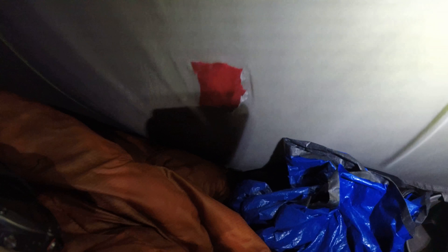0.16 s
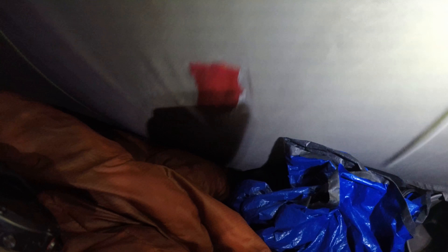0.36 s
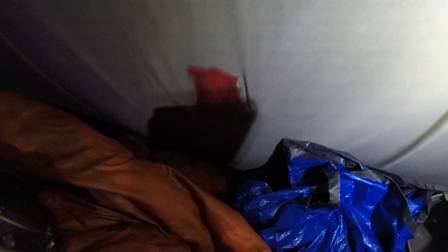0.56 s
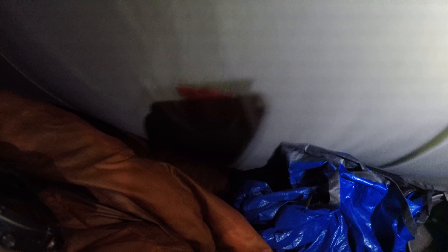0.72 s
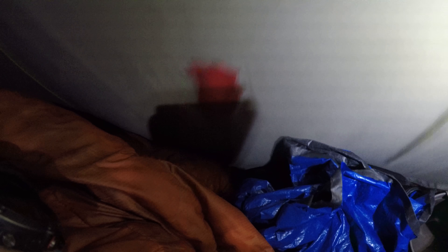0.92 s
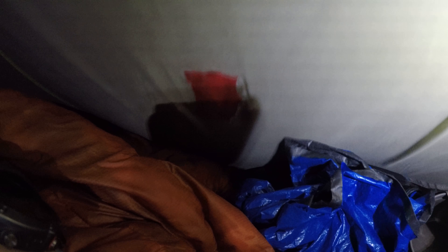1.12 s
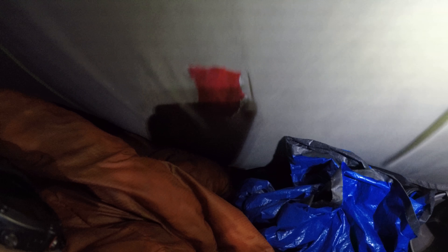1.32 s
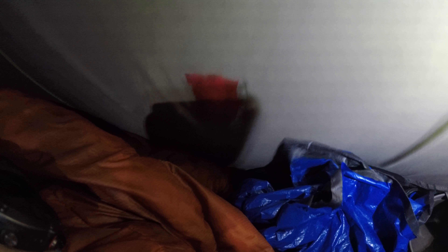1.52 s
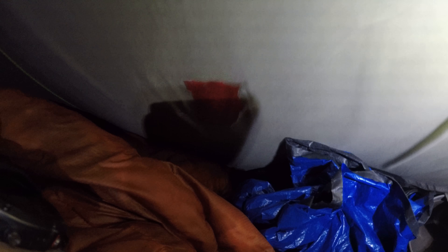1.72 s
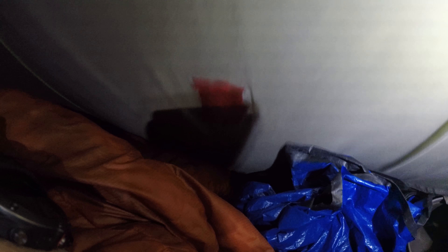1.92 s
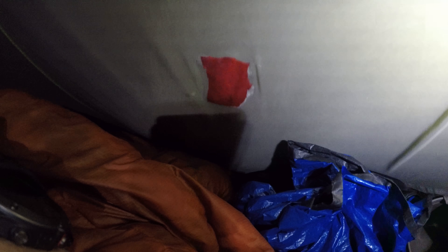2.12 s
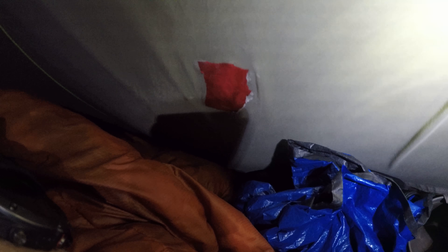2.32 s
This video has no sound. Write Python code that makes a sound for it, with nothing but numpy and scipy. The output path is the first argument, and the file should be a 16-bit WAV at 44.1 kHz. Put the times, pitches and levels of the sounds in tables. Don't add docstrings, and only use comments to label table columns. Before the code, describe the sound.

Tent walls shake in strong wind, heard close from inside: deep uneven rumble, crackling cloth rustle, dull knocks and sharp creasing snaps. One microphone fades in quickly after brief silence, its treble opening gradually.

```python
import sys
import numpy as np
from scipy import signal
from scipy.fft import rfft, irfft, next_fast_len
from scipy.io import wavfile
from scipy.ndimage import uniform_filter1d

SR = 44100
rng = np.random.default_rng(int(sys.argv[2]) if len(sys.argv) > 2 else 0)


def dump(signal):
    limited = np.clip(np.atleast_2d(signal).T, -1, 1)
    pcm = np.round(limited * 32767).astype(np.int16)
    wavfile.write(sys.argv[1], SR, pcm)


def convert_level_to_amplitude(level_db):
    exponent = np.asarray(level_db, float) / 20
    return 10 ** exponent


N = 104384

START_S, FULL_S = 0.128, 0.27

# t/s, wind pressure level/dB, cloth shaking level/dB
GUSTS = [(.28, -20, -38), (.5, -18.5, -37), (.56, -14.5, -27), (.62, -14, -30.5), (0.659, -15.5, -35.5),
         (.75, -15, -33.5), (.88, -10, -30), (1.0, -10.5, -28), (1.2, -14, -29.5), (1.4, -15.5, -36.5),
         (1.5, -16.5, -37.5), (1.56, -13, -26), (1.65, -13.5, -30.5), (1.73, -17.5, -36.5),
         (1.84, -15.5, -34.5), (2.08, -14.5, -31.5), (2.14, -22.5, -39.5), (2.239, -16.5, -29.5)]
# f/Hz, level/dB per Hz
RUMBLE_COLOUR = [(18, -24), (30, 2), (76, -1), (150, -3.5), (230, -11), (400, -19.5), (800, -51.5),
                 (2000, -80)]
# f/Hz, level/dB per Hz
RUSTLE_COLOUR = [(400, -9), (900, -2), (1500, 5.5), (2100, -4), (5300, -6.5), (6200, -15.5), (8800, -16),
                 (13000, -47.5)]
PATCH_BORDERS = [1100, 2100, 3500, 5800]
# f/Hz, level/dB per Hz
THUMP_COLOUR = [(100, -60), (200, -1.5), (330, -2.5), (500, 0.5), (720, -1.5), (880, -11), (1100, -19),
                (2500, -19)]
# f/Hz, level/dB per Hz
HISS_COLOUR = [(10800, -13), (11600, -1), (12500, 6), (14000, 2.5), (15300, -1)]
# centre t/s, rustle level/dB, thump level above the rustle/dB, half length t/s
WALL_FLAPS = [(0.277, -32, 13, 0.022), (0.322, -36, 14, 0.013), (0.417, -31, 8.5, 0.027),
              (0.475, -30.5, 10, 0.0076), (0.575, -17.5, -4.5, 0.034), (0.707, -16.5, -9, 0.01),
              (0.742, -16, -11, 0.011), (0.769, -21.4, 3.5, 0.012), (0.864, -15, -27, 0.064),
              (0.992, -15, 1, 0.0081), (1.064, -21, 4.5, 0.026), (1.11, -19, -5, 0.0049),
              (1.17, -18, -4, 0.0071), (1.25, -26, -12, 0.012), (1.282, -18.5, -10, 0.009),
              (1.337, -24, -1.5, 0.015), (1.418, -36, 5, 0.0069), (1.455, -23, 5.5, 0.01),
              (1.501, -26.5, 8.5, 0.0072), (1.601, -28.5, -14, 0.032), (1.652, -16, 3, 0.004),
              (1.703, -29.5, 8, 0.004), (1.794, -23.5, 4.5, 0.017), (1.858, -25, 1.5, 0.041),
              (1.975, -26, -35, 0.02), (2.002, -25, 2, 0.0053), (2.06, -36.5, 7, 0.025),
              (2.218, -24, 4.5, 0.011), (2.251, -26, 6, 0.0053), (2.33, -18, 3, 0.0057)]
# t/s, peak level/dB
TAUT_KNOCKS = [
    (0.356, -8.5),
    (0.565, -17),
    (1.044, -23),
    (1.194, -17),
    (1.603, -8.5),
    (1.658, -22),
    (1.882, -9.5),
    (2.043, -10),
    (2.094, -7),
    (2.276, -6.5),
]
# t/s, peak level/dB
CREASE_SNAPS = [(0.4754, -14), (0.5498, -3), (0.571, -9), (0.769, -20), (0.7844, -14), (0.8274, -8.5),
                (0.8739, -3), (0.9077, -7), (0.923, -10), (1.1098, -7), (1.195, -8), (1.4456, -9),
                (1.4544, -17), (1.564, -13), (1.6114, -22), (1.6542, -8), (1.86, -8.5), (1.884, -29),
                (1.89, -7.5), (1.897, -6), (2.0434, -26), (2.067, -10.5), (2.0874, -15), (2.3174, -19)]
# f/Hz, level/dB per Hz
SNAP_COLOUR = [(300, 0), (1500, 3), (5000, -4), (8000, -7), (11000, -23), (15300, -37)]


def colour(x, table):
    size = next_fast_len(N + 8192)
    hz = np.maximum(np.fft.rfftfreq(size, 1 / SR), 1)
    f, db = np.array(table).T
    gain = convert_level_to_amplitude(np.interp(np.log(hz), np.log(f), db, left=-120, right=-120))
    shaped = irfft(rfft(x, size) * gain, size)[..., :N]
    return shaped / np.sqrt(np.mean(gain ** 2))


def walk(per_s):
    hold = int(SR / per_s)
    steps = np.repeat(rng.standard_normal(N // hold + 1), hold)
    w = uniform_filter1d(uniform_filter1d(steps, hold), hold)[:N]
    return (w - w.mean()) / w.std()


def buffet(pressure_db, lift):
    wind = colour(rng.standard_normal(N), RUMBLE_COLOUR)
    return wind * convert_level_to_amplitude(pressure_db + 1.2 * walk(33)) * lift ** 0.1


def crackle():
    per_s, spread_db, top_db, decay_s, share = 900, 5.5, 8, 0.00082, 0.59
    chance, luck = rng.random((2, N))
    size_db = np.minimum(-spread_db * np.log(luck + 1e-9), top_db)
    hits = (chance < per_s / SR) * convert_level_to_amplitude(size_db) ** 2
    power = signal.lfilter([1], [1, -np.exp(-1 / (decay_s * SR))], hits)
    return np.sqrt(share * power / power.mean() + 1 - share)


def patchy(x):
    lows = [signal.sosfiltfilt(signal.butter(2, hz, fs=SR, output="sos"), x) for hz in PATCH_BORDERS]
    total = 0
    for band in np.diff([0 * x, *lows, x], axis=0):
        flicker_db = 1.5 * walk(45) + 2.2 * walk(300)
        total = total + band * convert_level_to_amplitude(flicker_db)
    return total


def rustle(effort):
    return patchy(colour(rng.standard_normal(N) * effort, RUSTLE_COLOUR))


def thump(push, grains):
    uneven = convert_level_to_amplitude(1.2 * walk(35.2))
    return colour(rng.standard_normal(N) * push * grains * uneven, THUMP_COLOUR)


def open_treble(t, x):
    treble = signal.sosfiltfilt(signal.butter(4, 5840, "high", fs=SR, output="sos"), x)
    gain = convert_level_to_amplitude(np.interp(t, [START_S, FULL_S, 0.89], [0, -9.5, 0]))
    return x + treble * (gain - 1)


def top_hiss(t, effort, fade):
    tick_decay_s, wide_s = 0.006, 0.78
    tick = convert_level_to_amplitude(-54) * (t > START_S - 0.006) * np.exp(-np.maximum(t - START_S, 0) / tick_decay_s)
    rise_db = np.interp(t, [FULL_S, 0.93, 1.39, 2.05, t[-1]], [-30, -18.5, 0, 0, -7])
    top = effort * fade * convert_level_to_amplitude(-22.5 + rise_db)
    wide = convert_level_to_amplitude(-0.5) * np.clip((t - wide_s) / 0.15, 0, 1)
    mid, side = colour(rng.standard_normal((2, N)) * [top + tick, top * wide + tick], HISS_COLOUR)
    return mid + side * np.array([[1], [-1]])


def swells(t, times, levels_db, half_s):
    shape = np.exp(-0.5 * ((t - times[:, None]) / half_s[:, None]) ** 2)
    return np.sqrt(np.sum((convert_level_to_amplitude(levels_db)[:, None] * shape) ** 2, axis=0))


def flaps(t):
    s, flap_db, thump_db, half_s = np.array(WALL_FLAPS).T
    rustle_swell = swells(t, s, flap_db - 5, half_s)
    thump_swell = swells(t, s, flap_db + thump_db - 3, half_s)
    return rustle_swell, thump_swell


def bursts(t, times, peaks_db, decay_s, attack_s):
    age = t - times[:, None]
    shape = np.clip(age / attack_s + 1, 0, 1) * np.exp(-np.maximum(age, 0) / decay_s)
    return np.sqrt(np.sum((convert_level_to_amplitude(peaks_db)[:, None] * shape) ** 2, axis=0))


def knocks(t):
    s, peak_db = np.array(TAUT_KNOCKS).T
    return bursts(t, s, peak_db - 8, decay_s=0.015, attack_s=0.008)


def snaps(t):
    s, peak_db = np.array(CREASE_SNAPS).T
    strength = bursts(t, s, peak_db - 12, decay_s=0.003, attack_s=0.001)
    return colour(rng.standard_normal(N) * strength, SNAP_COLOUR)


def scene():
    t = np.arange(N) / SR
    s, pressure_db, shake_db = np.array(GUSTS).T
    pressure_db, shake_db = np.interp(t, s, pressure_db), np.interp(t, s, shake_db)

    shiver_db, grains = 0.5 * walk(28.91), crackle()
    flap_rustle, flap_thump = flaps(t)
    effort = np.hypot(convert_level_to_amplitude(shake_db + 3.5 + shiver_db), flap_rustle) * grains
    thump_bed_db = shake_db + 5.5
    push = np.sqrt(convert_level_to_amplitude(thump_bed_db + shiver_db) ** 2 + flap_thump ** 2 + knocks(t) ** 2)
    lift = push / convert_level_to_amplitude(thump_bed_db)

    opened = np.clip((t - START_S) / 0.014 + 1, 0, 1)
    fade = convert_level_to_amplitude(np.interp(t, [START_S, FULL_S], [-29, 0])) * opened
    cloth_fade = convert_level_to_amplitude(np.interp(t, [START_S, 0.22, FULL_S], [-23, -12, 0])) * opened

    low = (buffet(pressure_db, lift) + thump(push, grains)) * fade
    cloth = open_treble(t, rustle(effort) + snaps(t)) * cloth_fade
    return low + cloth + top_hiss(t, effort, fade)


def top_cut(x):
    return signal.sosfilt(signal.butter(12, 15710, fs=SR, output="sos"), x)


def record(dry):
    ceiling = 1.1
    mono = dry.mean(0)
    mix = ceiling * np.tanh(mono / ceiling) + (dry - mono)
    return top_cut(mix)


dry = scene()
out = record(dry)
dump(out)
```